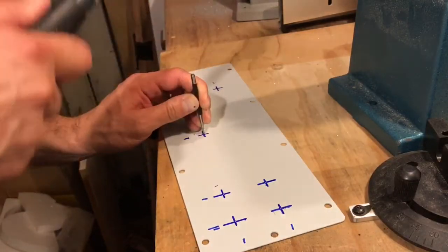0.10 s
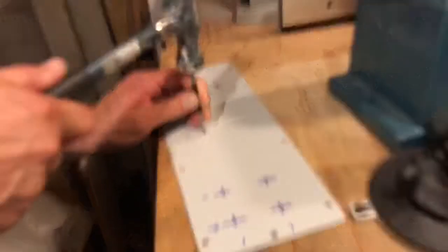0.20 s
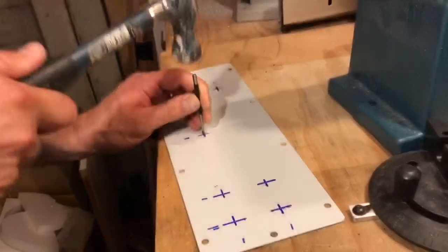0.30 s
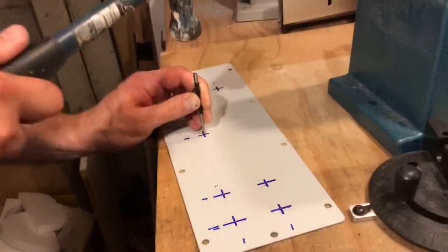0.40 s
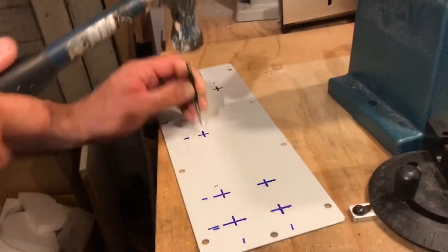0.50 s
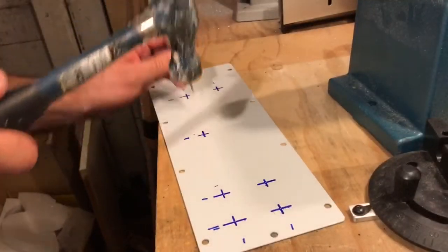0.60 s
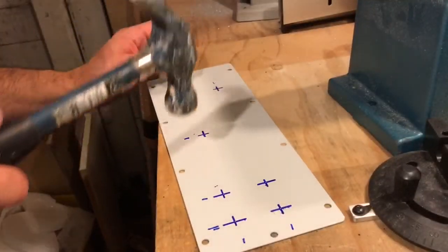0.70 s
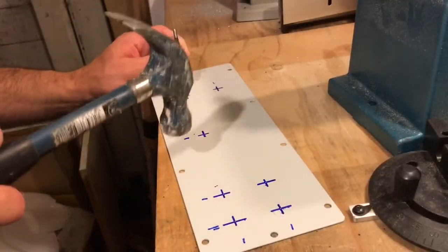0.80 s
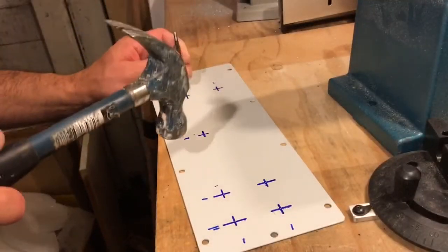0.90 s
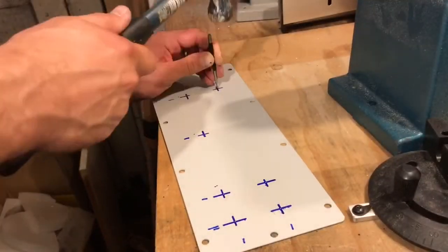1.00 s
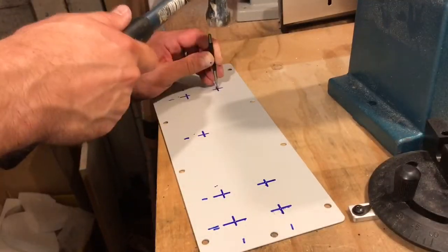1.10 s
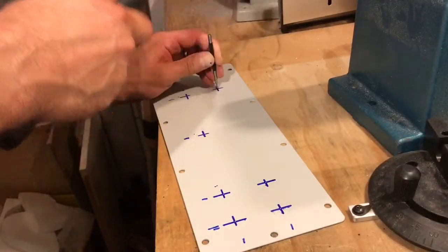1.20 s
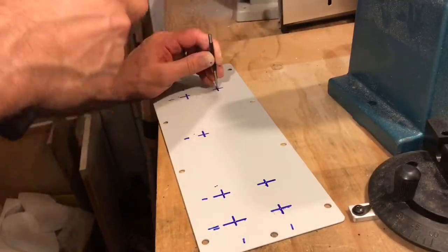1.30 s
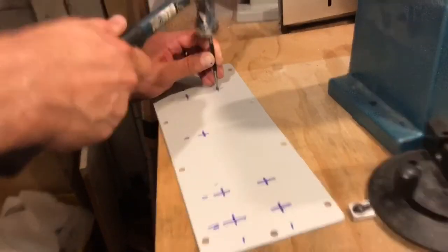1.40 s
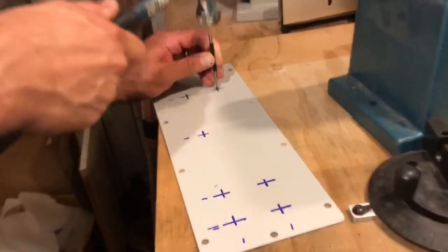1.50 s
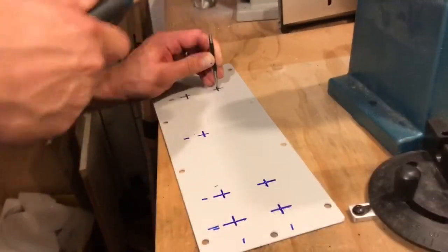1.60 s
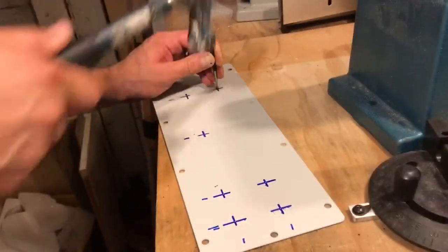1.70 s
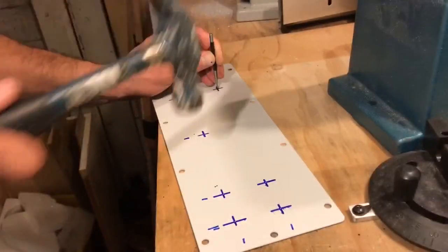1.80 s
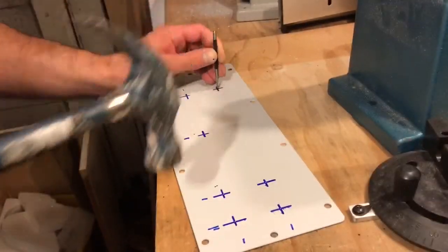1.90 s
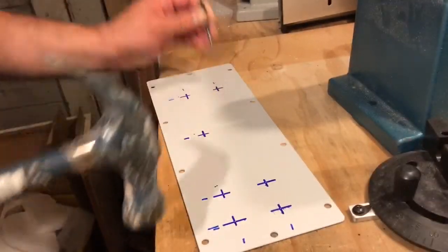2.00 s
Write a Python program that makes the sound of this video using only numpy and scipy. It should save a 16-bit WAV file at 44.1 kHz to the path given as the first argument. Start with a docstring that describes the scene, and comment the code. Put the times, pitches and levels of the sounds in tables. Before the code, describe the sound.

A hammer strikes a steel punch on a metal plate twice, in a small workshop.

```python
"""In a small workshop, a claw hammer strikes a steel centre punch twice, at two marks on a metal plate
lying on a wooden bench. Each impact excites a bright crack, a short ring of the steel modes and a knock
of the bench, which die away in the room; the second time the hammer bounces back onto the punch.
Between and after the blows a hand slides softly over the plate, making friction noise."""
import sys
import numpy as np
from scipy import signal
from scipy.fft import next_fast_len
from scipy.io import wavfile

SR = 44100
rng = np.random.default_rng(int(sys.argv[2]) if len(sys.argv) > 2 else 0)


def inscribe(sig):
    """Save sig as 16-bit PCM at rate SR to the path in sys.argv[1].

    A 1-D sig is mono; a 2-D sig holds one channel per row.
    Samples are clipped to [-1, 1] before scaling.
    """
    pcm = np.round(np.clip(np.atleast_2d(sig).T, -1, 1) * 32767)
    wavfile.write(sys.argv[1], SR, pcm.astype(np.int16))


N = 90405
TIME = np.arange(N) / SR
BAND_EDGES_HZ = 25 * 2 ** (np.arange(29) / 3)
BAND_CENTRES_HZ = np.sqrt(BAND_EDGES_HZ[:-1] * BAND_EDGES_HZ[1:])

# steady noise of the room: pitch_hz, band_level_db
ROOM_TONE_BANDS = [(28, -72.5), (45, -63), (70, -71), (100, -63.5), (160, -69.5), (260, -63.5),
                   (400, -72.5), (700, -76), (2000, -79.5), (5000, -82), (12000, -84), (16000, -85.5)]
# hum in the room: pitch_hz, rms_level_db
HUM_TONES = [(48.4, -66), (97, -60), (204.6, -66), (274.5, -63.5), (1373, -82.5), (1685, -83.5),
             (2225, -82)]
# course of the hand's slide over the plate: time_s, gain_db
SLIDE_CURVE = [(0.0, -28), (0.42, -22), (0.53, 1), (0.62, -3), (0.74, -2.5), (0.95, -10.5), (1.05, -40),
               (1.7, -9.5), (1.8, -0.5), (1.92, -0.5), (2.04, 6.5)]
# friction spectrum of the slide: pitch_hz, band_level_db
SLIDE_BANDS = [(300, -84.5), (1000, -81), (2500, -82.5), (6000, -79.5), (12000, -73.5), (16000, -78.5)]
# the punch tip touches the plate while being placed: start_s, level_db
TIP_TOUCHES = [(0.170, -67.5), (0.710, -68), (1.181, -62.5), (1.428, -59.5)]
# workshop reverberation: pitch_hz, band_level_db, t60_s
REVERB_BANDS = [(70, -69, .4), (121, -42.5, 1), (164, -44, 0.76), (230, -38.5, 1), (454, -46, 0.67),
                (1000, -51.5, 0.7), (2500, -50, 0.38), (5000, -48.5, .28), (10000, -40.5, 0.3),
                (13000, -46.5, .24), (16000, -64, .18)]
# tools on the bench that ring along: pitch_hz, level_db, t60_s
TOOL_MODES = [(112.3, -33, .6), (427.4, -46, 1.6), (870, -63.5, 1.8), (1430, -61.5, 0.47)]
# plate and tools settle back on the bench: start_s, level_db, pitch_hz
SETTLING_KNOCKS = [(0.28, -19, 108), (0.295, -7, 190), (0.31, -10.5, 291), (1.542, -25.5, 129),
                   (1.561, -22, 279)]
# modes of bench and plate: pitch_hz, first_mark_db, second_mark_db
BENCH_MODES = [(172, -15, -9.5), (213.6, 5, 1.5), (286.5, -2.5, -16), (352.7, -20, -27.5), (404, -22, -10),
               (435, -16, -25), (487.4, -12, -8), (597, -13, -15), (603, -25.5, -21.5),
               (720.3, -16.5, -25.5), (771.4, -20, -17.5), (846.5, -14, -15), (952, -17.5, -16),
               (1254, -23, -26), (1277, -17.5, -29), (1482, -23, -36.5), (1560, -20, -29), (1896, -25, -39)]
# rattle of the plate on the wood: pitch_hz, band_level_db, t60_s
CLATTER_BANDS = [(60.3, -31, 0.053), (146, -29.5, 0.56), (293, -23, .2), (597, -18, .19), (1080, -19, .18),
                 (2208, -21.5, .17), (3740, -25.5, .17), (4900, -29.5, 0.16), (7800, -24.5, 0.14),
                 (9550, -23, .17), (13100, -17.5, 0.082), (15500, -26.5, .14)]
# modes of hammer head and punch: pitch_hz, first_mark_db, second_mark_db, bounce_db, t60_s
STEEL_MODES = [(3223, -34.5, -22, -16.5, 0.11), (3550, -41.5, -36.5, -11, .09),
               (4375, -41, -28.5, -12, 0.17), (8670, -32, -24, -11.5, 0.12), (9420, -21.5, -22, -25.5, .12),
               (10685, -35, -32, -33, 0.13), (11850, -17, -12.5, -18.5, .08),
               (12830, -16, -15.5, -25, 0.07), (13400, -20.5, -33, -24.5, 0.088)]
# impact spectrum of steel on steel: pitch_hz, band_level_db
CRACK_BANDS = [(300, -26), (1000, -17.5), (3000, -20.5), (5500, -19), (8600, -15), (10000, -13.5),
               (12300, 2), (15500, -16.5)]
# hammer blows, one per mark: start_s, crack_db, steel_db, clatter_db, bench_db, thud_db, room_db
BLOWS = [(0.2375, -3.5, 0, 0.5, 0.5, -5.5, 1.5), (1.4870, -1.5, 1.5, 2, 2, 5.5, -1.5)]
# the sound drops out briefly: time_s, gain_db
DROPOUT_CURVE = [(0.996, 0), (1.006, -47), (1.025, -49), (1.043, -1.5)]


def from_db(db):
    """Amplitude ratio: tenfold for every 20 dB."""
    return 10 ** (np.asarray(db) / 20)


def per_band(table, column=1):
    """Interpolation of a spectrum over log frequency, one row per band."""
    table = np.array(table)
    return np.interp(np.log(BAND_CENTRES_HZ), np.log(table[:, 0]), table[:, column])[:, None]


def curve_gain(points):
    """Amplitude envelope, linear in decibels between its points."""
    return from_db(np.interp(TIME, *np.transpose(points)))


def band_noise(low_hz, high_hz):
    """Band-limited Gaussian noise of unit rms."""
    sos = signal.butter(2, [low_hz, min(high_hz, .45 * SR)], "band", fs=SR, output="sos")
    noise = signal.sosfilt(sos, rng.standard_normal(N + SR // 4))[-N:]
    return noise / np.sqrt(np.mean(noise ** 2) + 1e-20)


def noise_bank():
    """Uncorrelated third-octave bands of noise, one per row."""
    return np.array([band_noise(low, high) for low, high in zip(BAND_EDGES_HZ, BAND_EDGES_HZ[1:])])


def shaped_noise(spectrum, bank, envelopes=1):
    """Spectral shaping: noise bands are weighted and summed."""
    return (from_db(per_band(spectrum)) * bank * envelopes).sum(axis=0)


def decay(t60_s, rise_s=1e-5):
    """Exponential build-up and damping, which takes off 60 dB in t60_s."""
    return (1 - np.exp(-TIME / rise_s)) * np.exp(-np.log(1000) * TIME / t60_s)


def mode(hz, t60_s, rise_s):
    """A normal mode vibrates as a damped sinusoid."""
    return np.sin(2 * np.pi * hz * TIME) * decay(t60_s, rise_s)


def add(out, start_s, db, sound):
    """Superposition: a delayed, scaled sound adds to the mix."""
    start = int(start_s * SR)
    out[start:] += from_db(db) * sound[:N - start]


def room_tone():
    """Stationary background: broadband noise and the pure tones of a hum."""
    noise = shaped_noise(ROOM_TONE_BANDS, noise_bank())
    return noise + sum(from_db(db) * np.sqrt(2) * np.sin(2 * np.pi * (hz * TIME + rng.random()))
                       for hz, db in HUM_TONES)


def sliding_hand():
    """Sliding friction makes broadband noise as the hand moves the punch over the plate."""
    return shaped_noise(SLIDE_BANDS, noise_bank()) * curve_gain(SLIDE_CURVE)


def rustle(peak_s=1.785, width_s=.026, level_db=-61, centre_hz=2100):
    """An octave of noise under a Gaussian envelope is heard as a soft rustle."""
    noise = band_noise(centre_hz / np.sqrt(2), centre_hz * np.sqrt(2))
    return from_db(level_db) * noise * np.exp(-.5 * ((TIME - peak_s) / width_s) ** 2)


def tip_touches(centre_hz=3277):
    """Light impacts radiate tiny ticks as the punch tip feels for its mark."""
    out = np.zeros(N)
    for start_s, db in TIP_TOUCHES:
        noise = band_noise(centre_hz / np.sqrt(2), centre_hz * np.sqrt(2))
        add(out, start_s, db, noise * decay(t60_s=.044, rise_s=.0014))
    return out


def workshop(bank):
    """Reverberation dies fastest in the treble; tools ring on by sympathetic resonance."""
    tail = shaped_noise(REVERB_BANDS, bank, decay(per_band(REVERB_BANDS, 2), rise_s=.02))
    return tail + sum(from_db(db) * mode(hz, t60_s, rise_s=.01) for hz, db, t60_s in TOOL_MODES)


def settling_knock(hz):
    """A secondary impact of plate or tool on the bench gives a damped mode and a dull noise burst."""
    burst = from_db(-10.5) * band_noise(180, 870) * decay(t60_s=.035, rise_s=.00102)
    return burst - mode(hz, t60_s=.051, rise_s=.003)


def bench_knock(mark, rise_cycles=1.9):
    """The point of excitation sets the strength of each mode of bench and plate."""
    return sum((-1) ** k * from_db(levels_db[mark]) * mode(hz, t60_s=.14, rise_s=rise_cycles / hz)
               for k, (hz, *levels_db) in enumerate(BENCH_MODES))


def plate_clatter(bank, bass_rise_s=.0023, corner_hz=2497):
    """Overlapping modes of the plate buzzing on the wood merge into noise; the treble speaks first."""
    rise_s = bass_rise_s / (1 + (BAND_CENTRES_HZ[:, None] / corner_hz) ** 2)
    return shaped_noise(CLATTER_BANDS, bank, decay(per_band(CLATTER_BANDS, 2), rise_s))


def steel_ring(strike, half_width_hz=38):
    """Line broadening: grip and chattering contact blur each mode of hammer head and punch."""
    out = 0
    for hz, *levels_db, t60_s in STEEL_MODES:
        narrow_noise = band_noise(hz - half_width_hz, hz + half_width_hz)
        phase = np.angle(signal.hilbert(narrow_noise, next_fast_len(N))[:N])
        out = out + from_db(levels_db[strike]) * np.cos(phase) * decay(t60_s)
    return out


def steel_crack(bank):
    """The very short contact of steel on steel has a broad, bright spectrum."""
    return shaped_noise(CRACK_BANDS, bank) * decay(t60_s=.0084)


def hammering(bounce_s=1.5298, swell_hz=354, swell_width_s=.006):
    """Impulsive excitation: two blows drive steel, plate, bench and room; the second one rebounds."""
    out, bank = np.zeros(N), noise_bank()
    fresh_bank = lambda: np.roll(bank, rng.integers(N // 2), axis=1)   # a shift decorrelates the noise
    for mark, (start_s, crack_db, steel_db, clatter_db, bench_db, thud_db, room_db) in enumerate(BLOWS):
        contact = from_db(crack_db) * steel_crack(fresh_bank())
        contact += from_db(steel_db) * steel_ring(mark)
        contact += from_db(clatter_db) * plate_clatter(fresh_bank())
        add(out, start_s, 0, contact)
        add(out, start_s, bench_db, bench_knock(mark))
        add(out, start_s, thud_db, -mode(hz=56, t60_s=.067, rise_s=.03))   # one low swing of the bench
        add(out, start_s, room_db, workshop(fresh_bank()))
        # two faint ticks and a low swell lead into the blow
        for lead_s, db in ((.0232, -21.5), (.0116, -25)):
            add(out, start_s - lead_s, db, contact * decay(t60_s=.04))
        age_s = TIME - start_s
        swell = np.sin(2 * np.pi * swell_hz * age_s) * np.exp(-.5 * (age_s / swell_width_s) ** 2)
        out += from_db(-17.5) * swell
    add(out, bounce_s, -2, steel_crack(fresh_bank()))
    add(out, bounce_s, -2.5, steel_ring(strike=2) * decay(t60_s=.017))   # extra damping at the bounce
    add(out, bounce_s, -16, plate_clatter(fresh_bank()))
    for start_s, db, hz in SETTLING_KNOCKS:
        add(out, start_s, db, settling_knock(hz))
    return out


def scene():
    """The sound pressures of all sources superpose at one microphone."""
    return (hammering() + tip_touches() + room_tone() + sliding_hand() + rustle())[None]


def record(dry, ceiling=.82, low_hz=24, high_hz=16000):
    """Soft saturation rounds the peaks, filters limit the bandwidth, and the level dips briefly."""
    rounded = dry / (1 + (dry / ceiling) ** 4) ** .25
    high_pass = signal.butter(2, low_hz, "high", fs=SR, output="sos")
    low_pass = signal.ellip(10, .2, 80, high_hz, fs=SR, output="sos")
    dipped = signal.sosfilt(high_pass, rounded) * curve_gain(DROPOUT_CURVE)
    return signal.sosfilt(low_pass, dipped)


dry = scene()
out = record(dry)
inscribe(out)
```